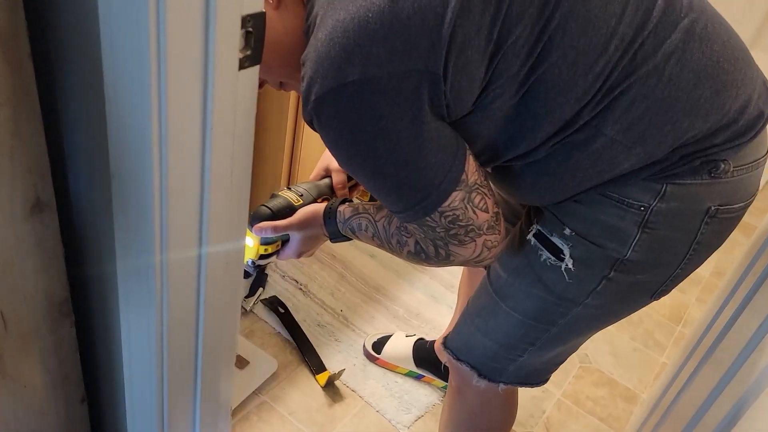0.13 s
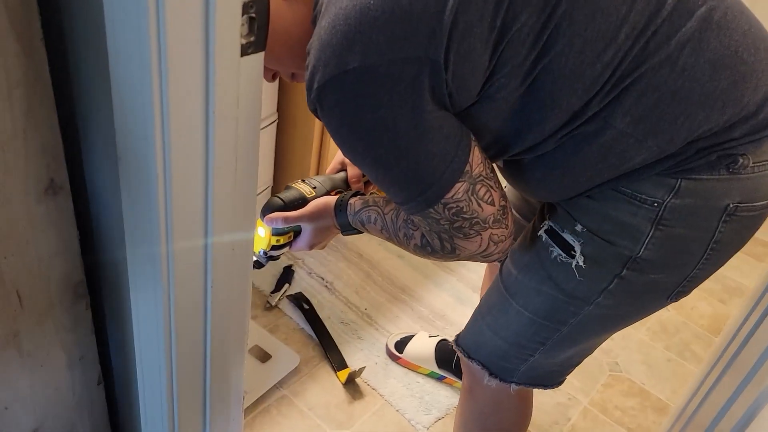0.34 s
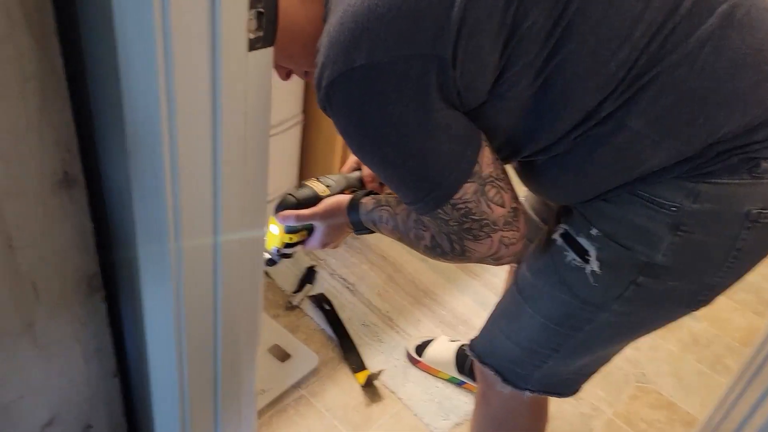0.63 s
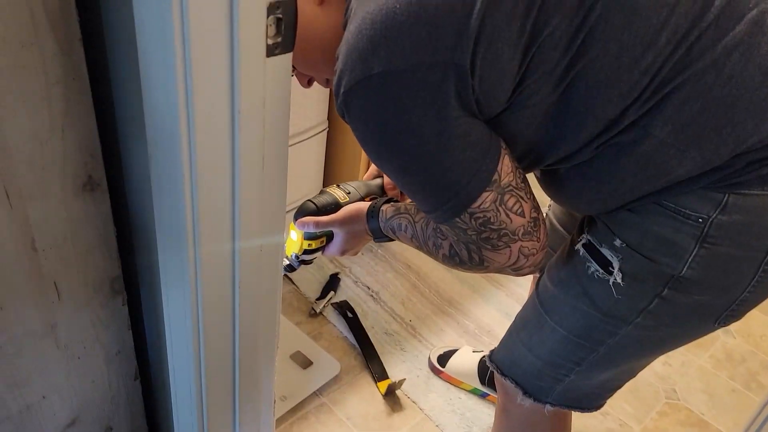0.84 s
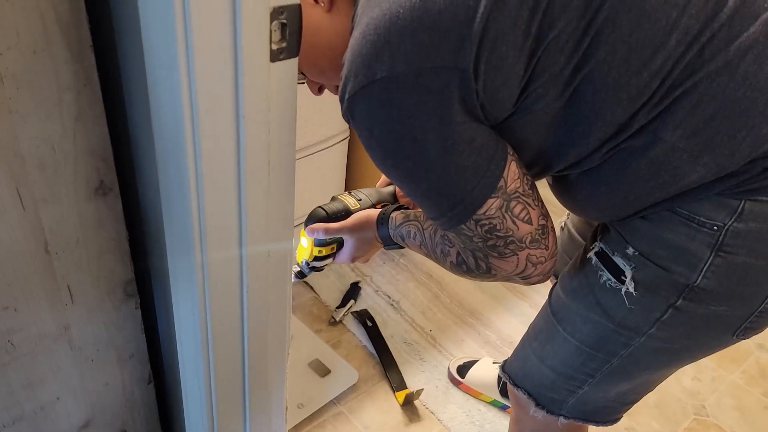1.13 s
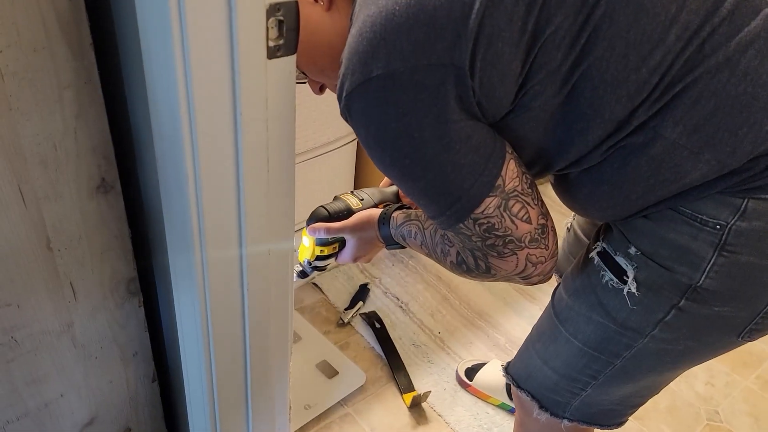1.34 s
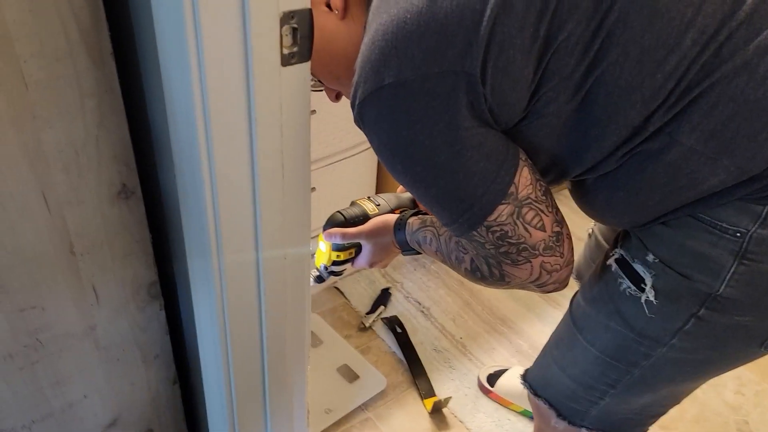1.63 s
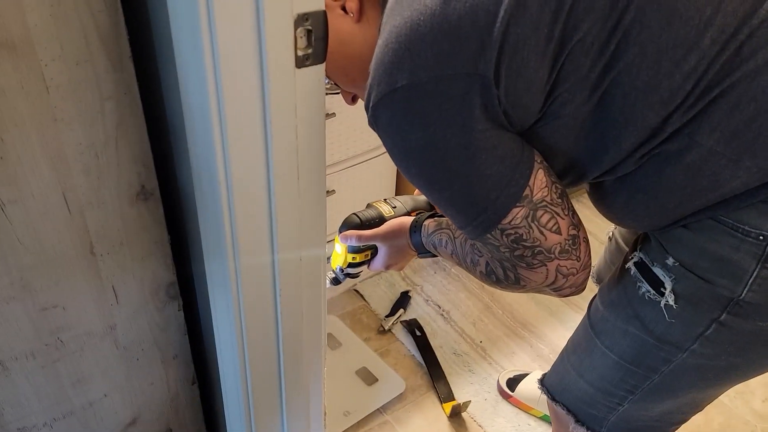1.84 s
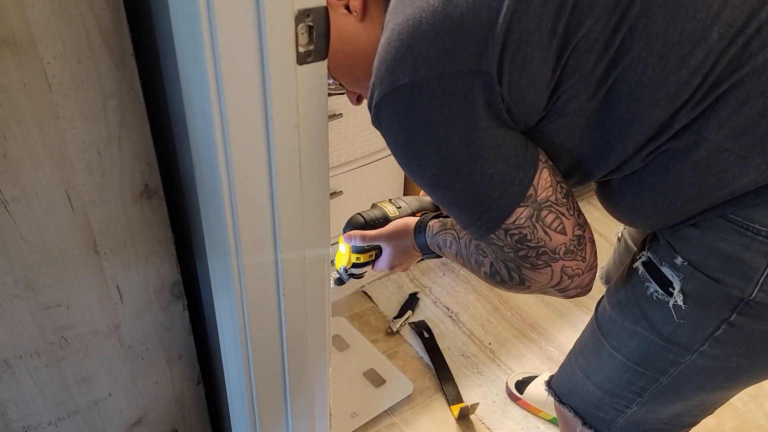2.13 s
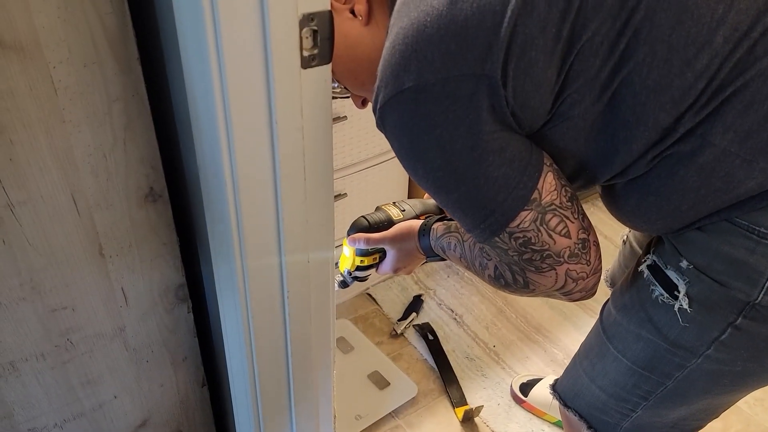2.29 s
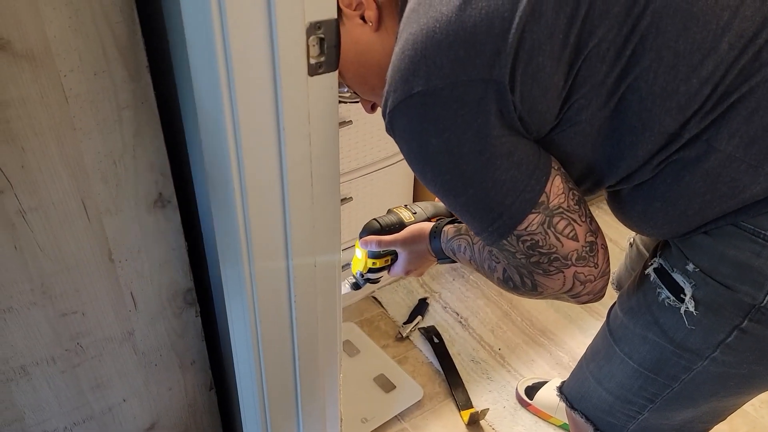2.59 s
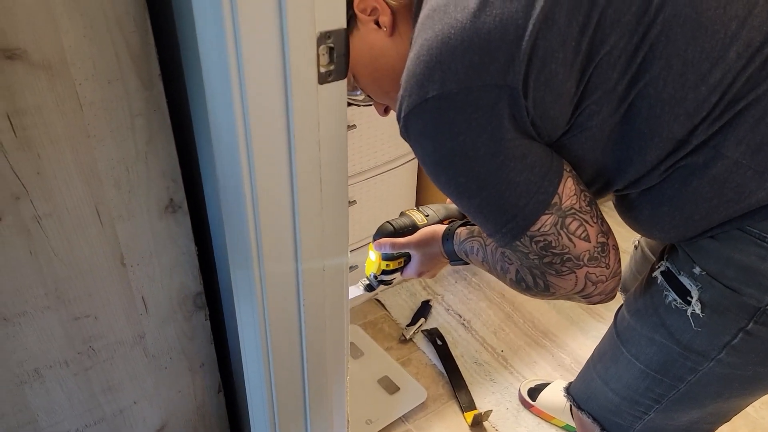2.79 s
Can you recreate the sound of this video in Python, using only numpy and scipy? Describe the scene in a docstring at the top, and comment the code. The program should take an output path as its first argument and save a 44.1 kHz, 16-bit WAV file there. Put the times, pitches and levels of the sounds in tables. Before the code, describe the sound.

From the start, a cordless oscillating saw buzzes in wooden trim, a harsh steady tone near 264 Hz with shifting overtones and gritty rasp. A high squeal strengthens after 1.5 s; faint handling thumps sit left, clearest around 1.7 s. At 2.0 s the blade breaks through, rattling brighter and noisier, rising slightly by 2.5 s. Around 2.8 s it brakes with a shudder and brief hallway ring.

```python
"""A cordless oscillating saw cuts wooden trim in a hallway: drifting overtones of one stroke rate make the buzz;
noise pulsing with the stroke makes the rasp of teeth on wood; its level varies at random across pitch and time.
Near the end the blade breaks through, speeds up and rattles loosely; then the trigger is released,
a band of noise shudders under the brake, and the hallway rings out briefly.
Soft handling thumps (short decaying sines) and a faint low noise rumble lie mostly on the left."""
import sys
import numpy as np
from scipy import signal
from scipy.io import wavfile
from scipy.ndimage import uniform_filter1d

SR = 44100
rng = np.random.default_rng(int(sys.argv[2]) if len(sys.argv) > 2 else 0)


def file_out(sig):
    """Save sig as 16-bit WAV at sys.argv[1]."""
    # one column per channel
    cols = np.atleast_2d(sig).T
    # limit, then scale
    lim = np.clip(cols, -1, 1)
    pcm = np.round(lim * 32767).astype(np.int16)
    wavfile.write(sys.argv[1], SR, pcm)


N = 130095
T = np.arange(N) / SR
STEP = 128  # samples between slow control values
CONTROL_T = np.arange(N // STEP + 2) * STEP / SR

# stroke rate, and swells of the loudest overtones as the blade bites:
# time_s, stroke_hz, then level_db of overtones 1, 2, 3, 4, 5, 7 and 13 in the mid
SWELLS = [(0.03, 264.2, -34.5, -29.5, -41, -48, -32, -37, -38.5),
          (0.31, 264.4, -35.5, -32.5, -39.5, -41, -29.5, -35, -35.5),
          (0.48, 262.9, -36, -44.5, -32.5, -40.5, -34, -45, -34.5),
          (0.6, 264.1, -36.5, -41, -35, -41, -32, -37, -31),
          (0.68, 263.8, -37, -45.5, -34, -39.5, -38.5, -48, -33),
          (0.93, 263.3, -35, -42, -38, -37.5, -51, -37, -32),
          (1.06, 262.8, -36, -44, -39, -36.5, -88, -33.5, -33),
          (1.1, 263.5, -35.5, -41, -39, -38.5, -47, -31.5, -32),
          (1.19, 262, -34, -42, -38, -35.5, -34.5, -40, -34),
          (1.24, 261.8, -34.5, -41.5, -43, -34.5, -40.5, -34.5, -43),
          (1.6, 264.7, -35, -39, -45.5, -40.5, -40.5, -30.5, -38.5),
          (1.99, 262.7, -34.5, -35.5, -32, -38, -38, -31, -35),
          (2.13, 266.2, -35.5, -43, -32.5, -43, -39, -39, -51),
          (2.21, 267.4, -38, -37, -32, -36.5, -46, -34.5, -38),
          (2.31, 268.6, -36.5, -31.5, -31.5, -37.5, -33.5, -37.5, -39),
          (2.46, 275.8, -39, -32.5, -36, -39.5, -45, -36, -47),
          (2.54, 276.9, -46.5, -28, -27.5, -33.5, -40, -38, -44),
          (2.67, 279.1, -45.5, -41, -49, -36.5, -51, -50, -41),
          (2.72, 278, -45, -36.5, -35, -35, -31, -39, -44),
          (2.8, 278.7, -55, -42, -47, -38.5, -54, -47, -51)]
# strength of the cut: time_s, base level_db of the other overtones, rasp level_db before pulsing
CUT_LEVELS = [(0, -39, -37), (.2, -36.5, -38.5), (.45, -35, -36), (.7, -35, -38), (.9, -33.5, -39),
              (1.15, -34, -36), (1.45, -34, -35.5), (1.75, -33, -37), (1.98, -33, -33),
              (2.08, -34.5, -27.5), (2.3, -34.5, -26), (2.45, -36, -25.5), (2.6, -35, -26),
              (2.75, -39, -24), (2.87, -41, -25)]
# what the two microphones hear differently: pitch_hz, side minus mid level_db
SIDE_LEVEL = [(100, -3), (264, -14), (530, -7.5), (1000, 4.5), (2000, 1), (3500, 1.5), (6000, -3.5),
              (12000, -3.5)]
# stereo lean: pitch_hz, share of the mid added to the side (positive is left, -1..1)
STEREO_LEAN = [(100, 0.17), (264, 0.32), (600, 0.11), (1500, -0.069), (3000, -0.98), (6000, -0.61),
               (14000, -0.67)]

BREAK_S, BREAK_RISE_S = 2.0, 0.075  # the blade breaks through and comes loose
BRAKE_S = 2.805
TONES_OFF_S, TONES_T60_S = 2.78, 0.43
RASP_OFF_S, ROOM_T60_S = 2.87, 0.23


def amp(db):
    """Decibels to linear gain."""
    return 10 ** (np.asarray(db) / 20)


def evened(x):
    """Scale to an rms of one."""
    return x / np.sqrt(np.mean(abs(x) ** 2) + 1e-20)


def curve(table, col, t):
    """Straight lines through one column of a table over time."""
    return np.interp(t, [row[0] for row in table], [row[col] for row in table])


def read(points, hz):
    """Read a (pitch, value) table along a logarithmic pitch scale."""
    f, value = np.transpose(points)
    return np.interp(np.log(hz + 1), np.log(f + 1), value)


def near(x, centre, width):
    """Bell-shaped weight, one at the centre."""
    return np.exp(-((x - centre) / width) ** 2)


def wander(corner_hz, count):
    """Rows of smooth complex chance, low-passed at the corner, one value per control step."""
    z = rng.standard_normal((count, N // STEP + 2, 2)) @ [1, 1j]
    f = np.fft.fftfreq(z.shape[1], STEP / SR)
    return evened(np.fft.ifft(np.fft.fft(z) / (1 + (f / corner_hz) ** 2)))


def release(off_s, t60_s, t):
    """Full level until switch-off, then an exponential fall of 60 dB per t60."""
    return amp(-60 * np.maximum(t - off_s, 0) / t60_s)


def looseness(t):
    """Blade state: 0 while it cuts, 1 once it has broken through."""
    return np.clip((t - BREAK_S) / BREAK_RISE_S, 0, 1)


def strokes():
    """Running count of blade strokes: the stroke rate summed over time."""
    return np.cumsum(curve(SWELLS, 1, T)) / SR


def buzz(turns):
    """Overtones locked to the stroke; each wanders on its own, differently in mid and side."""
    # multiples of the stroke rate whose levels the swell table sets
    loud = (1, 2, 3, 4, 5, 7, 13)
    # level_db of each overtone while cutting, from the stroke rate upward, relative to the base level
    orders_db = [1, -1, -2, -10, -3, -7, -4, -5, -6, -6.5, -6, -4, -2.5, -5.5, -9, -9, -9.5, -8.5, -12, -9,
                 -9, -9, -6.5, -6, -12, -15.5, -15.5]
    # overtones that sing out or drop away for a while: middle_s, length_s, multiple, change_db
    sings = [(0.88, 1, 6, 4), (1.47, 0.53, 6, -13), (2.3, 0.17, 6, -9), (2.493, 0.11, 6, 7),
             (0.99, 0.32, 8, 4), (0.49, 0.78, 10, 3.5), (1.32, 0.36, 10, -13), (1.906, .2, 10, -12),
             (0.87, 0.31, 11, -14), (0.935, 0.23, 12, -17), (1.93, 0.17, 12, 7), (2.3, 0.38, 12, 3.5),
             (0.93, 0.23, 14, -15), (1.76, 0.24, 14, 5.5), (2.39, 0.46, 14, 10), (1.05, 0.61, 20, 5.5),
             (0.75, 0.12, 21, 5), (0.95, 0.38, 22, 9), (0.53, 0.71, 23, 7), (0.884, 0.16, 24, 9.5)]
    top = 59  # highest multiple
    high_db, high_slope_db = -20.5, -0.5  # multiples above orders_db: first level, change per multiple
    drift, side_drift = 0.05, 0.82  # slow wander: mid (per multiple, up to 1), side
    flutter, steady_below = 0.17, 0.4  # quick wander, doubled when loose; low overtones flutter less
    jitter = 0.0022  # scale of the stroke timing error, share of a stroke
    loose_loss_db, loose_hz = -2.5, 4250  # loose blade: treble shelf, half its dB at this pitch
    squeal_s, squeal_db, squeal_late_db = 1.5, 5.5, 8  # boost near 9 kHz, and what is added late in the cut
    blow_below, blow_s = 8, 0.7  # multiples below this line up within this time once loose
    brake_wobble = 0.5  # the tones break up under the brake

    t = CONTROL_T
    slow, quick = wander(5, count=2 * top), wander(26.0, count=2 * top)
    turns = turns + jitter * np.interp(T, t, wander(33.0, count=1)[0].real)
    first_hz = SWELLS[0][1]
    speed_up = curve(SWELLS, 1, t) / first_hz
    colour_db = list(orders_db) + list(high_db + high_slope_db * np.arange(top - len(orders_db)))
    base_db = curve(CUT_LEVELS, 1, t)
    loose = looseness(t)
    late_squeal_db = squeal_late_db * np.clip((t - squeal_s) / 0.054, 0, 1)
    out = np.zeros((2, N))

    for k in range(1, top + 1):
        hz = k * first_hz
        # the wood's colour stays put as the speed rises
        own_db = np.interp(k * speed_up, np.arange(1, top + 1), colour_db)
        sing_db = sum(db * near(t, s, length / 2) for s, length, order, db in sings if round(order) == k)
        tone_squeal_db = (squeal_db + late_squeal_db) * near(hz, 9310.0, 420.0)
        loss_db = loose_loss_db * loose / (1 + (loose_hz / hz) ** 2)
        level = amp(base_db + own_db + sing_db + tone_squeal_db + loss_db)

        # once loose, the low overtones line up into one blow per stroke
        lined_up = np.clip((t - BREAK_S) / blow_s, 0, 1) * (k < blow_below)
        start = -1j * np.exp(2j * np.pi * (rng.random((2, 1)) - 0.5) * (1 - lined_up))
        slow_mid, slow_side = slow[2 * k - 2], slow[2 * k - 1]
        side = level * (start[1] + side_drift * slow_side) / np.hypot(1, side_drift)
        if k in loud:
            swell = amp(curve(SWELLS, 2 + loud.index(k), t))
            mid = swell * start[0] * np.exp(0.3j * slow_mid.real)
        else:
            mid_drift = min(drift * k, 1)
            mid = level * (start[0] + mid_drift * slow_mid) / np.hypot(1, mid_drift)
        if k == 1:
            side = mid * -1j  # the lowest tone reaches the right microphone a little earlier
        side = amp(read(SIDE_LEVEL, hz)) * side + read(STEREO_LEAN, hz) * mid

        unsteady = flutter * (1 + loose) * k / (k + steady_below) + brake_wobble * (t > BRAKE_S)
        fade = release(TONES_OFF_S if k > 1 else RASP_OFF_S, TONES_T60_S, t)
        spin = np.sqrt(2) * np.exp(2j * np.pi * k * turns)
        for c, tone in enumerate((mid + side, mid - side)):
            tone = tone * (1 + unsteady * quick[2 * k - 2 + c]) * fade
            out[c] += (np.interp(T, t, tone) * spin).real
    return out


def rasp(turns):
    """Noise of teeth on wood, pulsing with the stroke, randomly uneven; brighter once the blade is loose."""
    # noise colour of teeth biting wood: pitch_hz, relative level_db
    bite_colour = [(60, -27), (200, -0.5), (420, -35), (1000, -3.5), (1800, -5.5), (2300, -16), (2900, 2),
                   (4000, -3.5), (6500, -1.5), (8000, -14.5), (9500, -6), (11500, -16.5), (15500, -13.5)]
    # noise colour of the loose blade: pitch_hz, relative level_db
    rattle_colour = [(60, -32), (200, -27), (420, -29), (1000, -11), (2400, -7), (3100, -0.5), (5500, 0.5),
                     (7000, -2.5), (9500, -5.5), (11500, -9), (14300, -10.5), (15100, -14), (15320, -1),
                     (15550, -18.5)]
    # random unevenness of the noise over pitch and time, weaker toward the lowest pitches
    uneven_db, loose_uneven_db = 5, 1.5
    gate_one, gate_two = 0.2, 0.6  # pulse depth once and twice per stroke, while cutting
    loose_even = 0.3  # share of the pulsing lost when loose

    frames, hz = N // STEP + 5, np.fft.rfftfreq(512, 1 / SR)
    a, b, c, d, unevenness = rng.standard_normal((frames, 257, 5)).T
    unevenness = uniform_filter1d(unevenness, size=2, axis=0)  # across pitch
    unevenness = evened(uniform_filter1d(unevenness, size=40, axis=1))  # across time
    loose = looseness((np.arange(frames) - 2) * STEP / SR)
    bite, rattle = (evened(amp(read(points, hz)))[:, None] for points in (bite_colour, rattle_colour))
    colour = (1 - loose) * bite + loose * rattle
    depth_db = uneven_db + (loose_uneven_db - uneven_db) * loose
    uneven_gain = amp(depth_db * unevenness * (hz / (hz + 79.0))[:, None])

    mid = a + 1j * b
    side = amp(read(SIDE_LEVEL, hz))[:, None] * (c + 1j * d) + read(STEREO_LEAN, hz)[:, None] * mid
    spectrum = np.array([mid + side, mid - side]) * colour * uneven_gain
    noise = evened(signal.istft(spectrum, nperseg=512, noverlap=384)[1][:, :N])

    # the pulsing stops quickly at switch-off while the noise rings on
    running = release(RASP_OFF_S, 0.029, T) * (1 - loose_even * looseness(T))
    pulses = gate_one * np.cos(2 * np.pi * turns) + gate_two * np.cos(4 * np.pi * turns + 1.0)
    gate = 1 + running * pulses
    return noise * gate * amp(curve(CUT_LEVELS, 2, T)) * release(RASP_OFF_S, ROOM_T60_S, T)


def brake():
    """The brake grabs and the housing shudders: a short band of noise, ringing out in the hallway."""
    rise_s, hold_s, level_db = 0.011, 0.058, -41  # level before the time shape
    band = signal.butter(2, [418, 1797], "band", fs=SR, output="sos")
    a, b = signal.sosfilt(band, rng.standard_normal((2, N)))
    rise = np.clip((T - BRAKE_S) / rise_s, 0, 1)
    shape = rise * release(BRAKE_S + rise_s + hold_s, ROOM_T60_S, T)
    return amp(level_db) * shape * evened(np.array([a + 0.33 * b, a - 1.0 * b]))


def handling():
    """Soft thumps (decaying sines of slightly falling pitch) and faint low noise, mostly left."""
    # handling thumps: start_s (before the lag below), level_db of the envelope peak on the left
    thump_hits = [(0.713, -43), (1.086, -38), (1.355, -43), (1.539, -37), (1.672, -32), (1.764, -28.5),
                  (2.094, -38), (2.572, -43)]
    # rumble: time_s, level_db before the right side is lowered
    rumble_levels = [(0, -77), (1, -55.5), (1.6, -60), (2.1, -65), (2.25, -74), (2.6, -60), (2.7, -84),
                     (2.95, -62)]
    thump_hz, decay_s, lag_s = 166, 0.0017, 0.0112  # nominal pitch, decay, lag
    right_db = -12

    u = np.arange(4000) / SR / decay_s
    kicks = np.zeros(N)
    for s, db in thump_hits:
        kicks[round((s + lag_s) * SR)] = amp(db)
    envelope = np.e * u * np.exp(-u)
    knock = envelope * np.sin(2 * np.pi * thump_hz * decay_s * u ** 0.94)
    thumps = signal.oaconvolve(kicks, knock)[:N]

    band = signal.butter(2, [30, 112], "band", fs=SR, output="sos")
    low = signal.sosfilt(band, rng.standard_normal((2, N)))
    lumps = amp(5.7 * np.interp(T, CONTROL_T, wander(8.7, count=1)[0].real))  # uneven loudness
    rumble = amp(curve(rumble_levels, 1, T)) * evened(low * lumps)
    return (thumps + rumble) * amp([[0], [right_db]])


def scene():
    """Saw, brake and handling together; buzz and rasp share one stroke count."""
    turns = strokes()
    return buzz(turns) + rasp(turns) + brake() + handling()


def record(dry):
    """Band limit: a steep linear-phase low-pass at 15.76 kHz."""
    lowpass = signal.firwin(2047, 15760, window=("kaiser", 10), fs=SR)
    return signal.oaconvolve(dry, lowpass[None], "same")


dry = scene()
out = record(dry)
file_out(out)
```